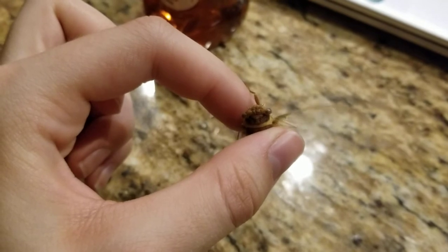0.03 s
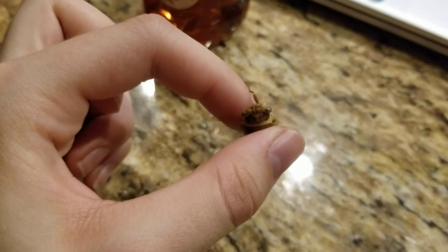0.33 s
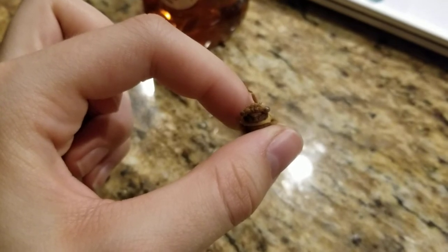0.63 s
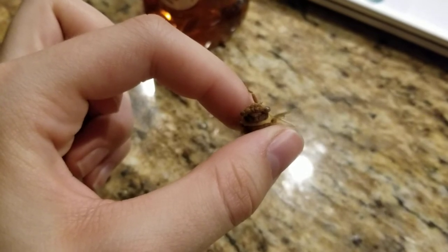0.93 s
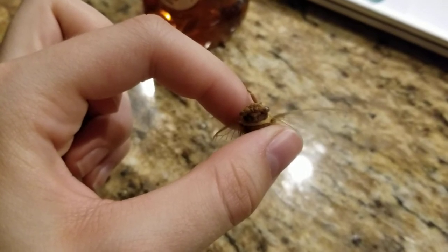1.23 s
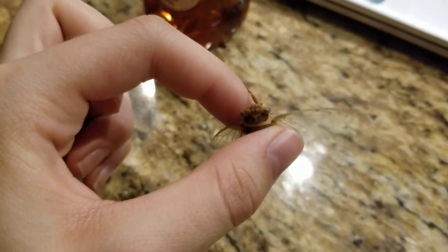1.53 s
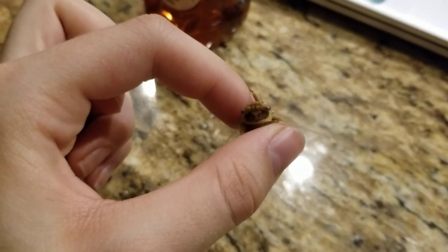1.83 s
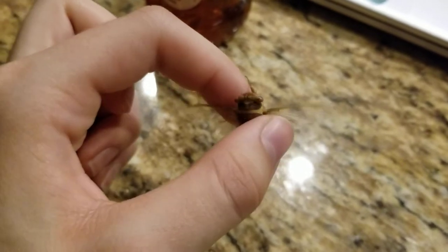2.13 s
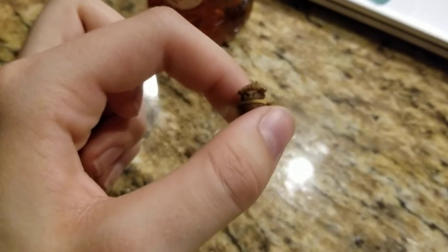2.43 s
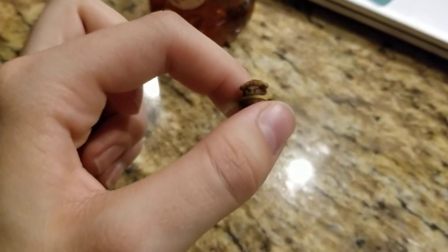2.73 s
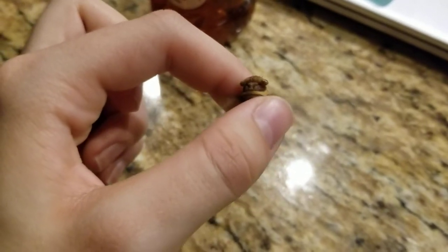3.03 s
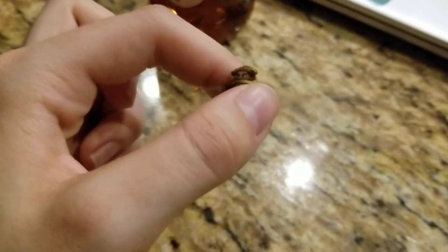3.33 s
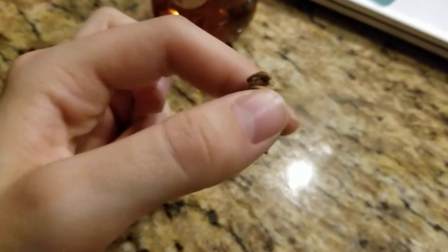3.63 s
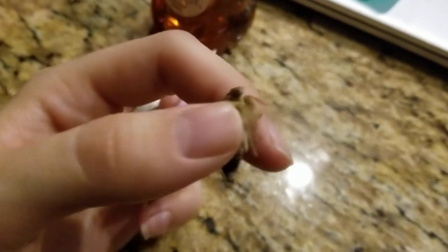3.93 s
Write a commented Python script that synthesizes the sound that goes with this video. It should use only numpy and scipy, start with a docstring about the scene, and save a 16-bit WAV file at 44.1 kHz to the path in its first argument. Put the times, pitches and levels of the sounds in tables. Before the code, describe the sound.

A cicada held between finger and thumb buzzes in harsh, high bursts close to the microphone, mostly on the right. Wing ticks fill the early gaps, then the bursts come shorter and quicker, over a low kitchen rumble.

```python
"""A kitchen, close to the microphone: a cicada held between finger and thumb buzzes in bursts.
Its two tymbals each click in and out about 137 times a second, drift apart and slow at the end
of a burst; the closing fingers colour the buzz. Its wings rustle, tick on the fingers and pat the air.
The insect sits mostly to the right, with a low room rumble and an appliance's hum behind it."""
import sys
import numpy as np
from scipy import signal
from scipy.fft import rfft, irfft
from scipy.io import wavfile
from scipy.ndimage import uniform_filter1d

SR = 44100
rng = np.random.default_rng(int(sys.argv[2]) if len(sys.argv) > 2 else 0)


def to_wav(s):
    """Save 16-bit WAV."""
    ch = np.atleast_2d(s).T  # columns
    pcm = np.round(np.clip(ch, -1, 1) * 32767)  # PCM
    wavfile.write(sys.argv[1], SR, pcm.astype(np.int16))


N = 176400


def amp(db):
    """Decibels to gain."""
    return 10 ** (np.asarray(db) / 20)


def unit_rms(x):
    """Scales to rms 1."""
    return x / np.sqrt(np.mean(x ** 2) + 1e-20)


def unit_energy(x):
    """Scales each channel to energy 1."""
    return x / np.linalg.norm(x, axis=1, keepdims=True)


def at_hz(points, hz):
    """Reads a spectrum on a log-frequency axis."""
    f, value = np.transpose(points)
    return np.interp(np.log(hz + 1), np.log(f), value)


def at_time(points, s):
    """Reads a level curve at time s."""
    return np.interp(s, *np.transpose(points))


def add(mix, s, sound):
    """Mixes a sound into both channels at time s."""
    part = mix[:, max(round(s * SR), 0):][:, :sound.shape[-1]]
    part += sound[..., :part.shape[1]]


def wander(count, size):
    """Smooth chance values of rms 1."""
    return unit_rms(uniform_filter1d(uniform_filter1d(rng.standard_normal(count), size), size))


def drift(count, shape, memory):
    """Chance values of rms 1, one set per stroke, each resembling the one before."""
    values = rng.standard_normal((count, *shape))
    for k in range(1, count):
        values[k] = memory * values[k - 1] + np.sqrt(1 - memory ** 2) * values[k]
    return values


def causal(db):
    """Spectrum of the quickest-dying response with this gain."""
    log_gain = np.log(amp(np.r_[db, db[-2:0:-1]]))
    return np.exp(np.conj(signal.hilbert(log_gain)))[:len(db)]


def tint(x, colour):
    """Filters a long sound to a colour, rms 1."""
    return unit_rms(irfft(rfft(x) * amp(at_hz(colour, np.fft.rfftfreq(N, 1 / SR))), N))


def noise(apart):
    """Stereo noise, partly shared by the two sides."""
    return rng.standard_normal(N) + apart * rng.standard_normal((2, N))


# Steady room tone around the microphone: f/Hz, level/dB
ROOM_TONE = [(20, -17), (53, -23), (84, 1), (200, -1), (528, -12), (929, -19.5), (1700, -42.5), (2500, -37),
             (5000, -22), (16000, -26.5)]
# Swells of low rumble, leaning left: t/s, level/dB
SWELLS = [(0.0, -63.5), (.11, -52), (.57, -56.5), (1.3, -58), (1.71, -53.5), (1.95, -53.5), (2.08, -48),
          (2.13, -64), (2.24, -53), (4.0, -60)]
# Colour of the swells: f/Hz, level/dB
SWELL_COLOUR = [(20, -39), (40, -6), (60, -2), (80, 5), (110, -9), (250, -19), (1000, -64)]
# Partials of an appliance in the background: f/Hz, level/dB
HUM = [(58.8, -65), (193, -64.5), (289, -71.5), (386.6, -76)]
def kitchen_ambience():
    """Room tone with low swells, and an appliance's wavering hum."""
    t = np.arange(N) / SR
    hum = sum(amp(db) * np.sqrt(2) * np.sin(2 * np.pi * hz * t + 0.88 * wander(N, size=9000))
              for hz, db in HUM)
    swells = tint(noise(apart=0.92), SWELL_COLOUR) * amp(at_time(SWELLS, t)) * amp([[3], [-2]])
    return hum + swells + amp(-57) * tint(noise(apart=1.0), ROOM_TONE)


# Fits of wing rustle, close up: t/s, level/dB
RUSTLE_FITS = [(0.0, -66), (.14, -62), (.25, -77), (.32, -54), (.41, -57), (.5, -69.5), (.62, -57),
               (.72, -79.5), (.8, -56), (.88, -54), (.93, -67.5), (1.1, -56.5), (1.26, -78), (1.34, -54),
               (1.41, -56.5), (1.44, -78), (1.53, -76), (1.64, -55.5), (1.71, -61.5), (1.79, -79),
               (1.87, -54.5), (2.05, -56), (2.15, -66), (2.25, -56), (2.6, -57.5), (3.3, -65.5),
               (3.6, -66.5), (3.64, -53), (3.71, -65.5), (3.8, -56), (3.95, -68.5)]
# Colour of the rustle: f/Hz, level/dB
RUSTLE_COLOUR = [(150, -2), (400, -1), (1000, 0.5), (1600, -3.5), (2200, -1.5), (3000, -9.5), (6000, 4),
                 (15000, -24)]
def wing_rustle(wing_hz=43.15, flap_decay_s=.005, uneven_db=1.2, upstroke_db=-3):
    """Wings rustle in fits, one soft flap on each up and down stroke, in step with the wing beats."""
    t = np.arange(N) / SR
    strokes = np.cumsum(2 * wing_hz * (1 + .03 * wander(N, size=3000))) / SR
    for start, end, rate_hz, _ in BEAT_RUNS:
        strokes = np.where((t > start) & (t < end), 2 * rate_hz * (t - start), strokes)
    index = strokes.astype(int)
    strength = amp(uneven_db * rng.standard_normal(N)[index] + upstroke_db * (index % 2))
    flap_age = (strokes % 1) / (2 * wing_hz)
    flaps = strength * np.exp(-flap_age / flap_decay_s) + .16  # some rustle lasts between flaps
    return tint(noise(apart=1.0) * flaps, RUSTLE_COLOUR) * amp(7 + at_time(RUSTLE_FITS, t))


# Colour of a close click in a loose, a firm and a pinched grip: f/Hz, level/dB
LOOSE_GRIP = [(1470, -70), (2500, -52), (3480, -23.5), (4330, -4.5), (4900, -11), (5500, -9.5), (6000, -1),
              (6400, -2.5), (7050, -4), (7800, -14), (8400, -16.5), (9050, -19.5), (9700, -17),
              (10600, -9.5), (12000, -15.5), (13100, -13.5), (14400, -5.5), (15200, -15), (15800, -13.5)]
FIRM_GRIP = [(1470, -42), (2500, -45), (3680, -37), (4320, -22), (4900, -28.5), (5450, -9), (6070, 1.5),
             (7030, -7), (7800, -15), (8520, -14.5), (9350, -19.5), (10500, -14.5), (11150, -18),
             (12300, -10.5), (13300, -15.5), (14500, -26), (15200, -18.5), (15800, -32)]
PINCHED_GRIP = [(1470, -34), (2500, -44), (3200, -37), (3850, -31.5), (4400, -24), (4970, -3.5),
                (5700, 0.5), (6410, -0.5), (7590, -2), (8600, -8.5), (9720, -16), (11200, -12), (12600, -4),
                (14000, -21), (15800, -21)]
# Resonance of the gap between the fingers: t/s, f/Hz, level/dB
FINGER_GAP = [(1.6, 8350, 0.5), (2.1, 9000, -1), (2.5, 8830, 6), (3.0, 8680, 5), (3.25, 8360, 4),
              (3.47, 8270, 7), (3.62, 7920, 4.5), (3.72, 7560, 3.5)]
# The buzz at the microphone, left minus right: f/Hz, level/dB
LEFT_BALANCE = [(2500, 3.5), (4500, -9), (5200, -8.5), (6100, -33), (7000, -47), (8600, -7.5), (10500, -13),
                (12500, -12.5), (15500, -0.5)]
def held_body(start, grip, hz, gap_width_hz=420):
    """Left and right response of the abdomen and the fingers round it."""
    db = sum(np.maximum(1 - abs(np.clip(grip, 0, 2) - k), 0) * at_hz(colour, hz)
             for k, colour in enumerate([LOOSE_GRIP, FIRM_GRIP, PINCHED_GRIP]))
    times, centres, heights = np.transpose(FINGER_GAP)
    gap_hz, gap_db = np.interp(start, times, centres), np.interp(start, times, heights)
    peak = np.exp(-((hz - gap_hz) / gap_width_hz) ** 2)
    dip = np.exp(-((hz - gap_hz * .885) / gap_width_hz) ** 2)
    low_cut_db = at_hz([(1200, -15.5), (3000, -4.0), (4200, -2.5)], hz)
    db = db + gap_db * (peak - dip) + low_cut_db
    left, right = causal(db + at_hz(LEFT_BALANCE, hz)), causal(db)
    return np.array([left, right]) / np.linalg.norm(irfft(right))


RETURN_MS = 3.6  # from a tymbal's in-click to its out-click, unsqueezed
def stroke_times(start, end, rate_hz, sag=.22, sag_s=.018):
    """Steady muscle strokes that slow just before the last one."""
    last = end - RETURN_MS / 1000
    if last - start < .5 / rate_hz:
        return [start]
    t = np.linspace(start, last, 400)
    lost_s = sag * sag_s * (np.exp((t - last) / sag_s) - np.exp((start - last) / sag_s))
    turns = (t - start - lost_s) * rate_hz
    return np.interp(np.linspace(0, turns[-1], round(turns[-1]) + 1), turns, t)


# Loose crinkling in a click: f/Hz, share of the power/0-1
CRINKLE_SHARE = [(3000, 0.42), (5000, 0.36), (6100, 0.12), (7200, 0.57), (9000, 0.39), (12500, 1),
                 (15800, 1)]
def buckle(rib_phase, creases, hz, crinkle_s=.0015):
    """Spectrum of one buckling: a clean snap, and a crinkle that trails it in the treble."""
    t = np.arange(creases.shape[1]) / SR
    crinkle = rfft(unit_energy(creases * np.exp(-t / crinkle_s)))
    share = at_hz(CRINKLE_SHARE, hz)
    return np.sqrt(1 - share) * np.exp(1j * rib_phase) + np.sqrt(share) * crinkle


# Change of colour as a burst goes on: f/Hz, slope/(dB/s)
BRIGHTENING = [(7500, -8), (10500, 8), (15000, -11)]
# Rise and fall of the buzz's treble: t/s, level/dB
TREBLE_LEVEL = [(.82, -6), (.93, 4.5), (1.06, -3), (1.3, -2.5), (2.15, 0), (2.6, 9), (3.3, 2.5), (3.65, -6),
                (3.8, 8.5)]
# How much of that level each band takes: f/Hz, share/0-1
TREBLE_SHARE = [(7000, 0), (10000, 0.12), (14500, 0.18)]
# Buzzes close to the microphone: start t/s, end t/s, stroke f/Hz, level/dB, second tymbal's lag/ms,
# its settling time/s, its out-click level/dB, grip (0 loose, 1 firm, 2 and up pinched)
BURSTS = [(0.01, 0.017, 137, -2.5, 0, .05, -19, -0.5), (0.288, .474, 136, -1.5, 1.2, 0.07, 2.5, 0.5),
          (0.7667, 1.07, 137, -1.5, 2.63, 0.061, 4.5, 0.53), (1.084, 1.09, 170, -1.5, -3, .05, 6, 1.2),
          (1.292, 1.379, 156, -0.5, 1, 0.025, -2, 0.52), (1.5564, 1.638, 172, -2, 2, 0.024, 1, 0.6),
          (1.65, 1.658, 131, -2, 0, .05, 3, 0.5), (1.8301, 2.168, 135, 0.5, 1.8, 0.089, 3.5, 0.8),
          (2.177, 2.265, 131, 1.5, 3, 0.0044, -0.5, 0.86), (2.2859, 2.374, 129, 4, 1.2, 0.0042, -28, 1),
          (2.4214, 2.57, 138, 3, 1.5, 0.015, -7.5, 0.98), (2.607, 2.699, 144, 4, 3, 0.0054, -29, 1.02),
          (2.7338, 2.862, 126, 2.5, 3, .006, 0, 1), (2.88, 3.045, 134, 2.5, 2.5, 0.0056, -3, 1),
          (3.0633, 3.159, 137, 3, 2, 0.0025, -36, 1.06), (3.213, 3.215, 160, 1, -6, .05, -5, 1.3),
          (3.235, 3.307, 135, 1.5, 2.5, 0.018, -1, 1.2), (3.4403, 3.501, 145, 2, 2.9, 0.0087, -2.5, 1.5),
          (3.6155, 3.679, 131, 4, 2.1, 0.0075, -7, 1.7), (3.7272, 3.906, 132, 2.63, 2.2, 0.0056, -8, 2.24)]
def tymbals(size=512, swell_db_per_s=14.5, slip_ms=.17, jitter_ms=.027, uneven_db=.8):
    """Each muscle stroke clicks a tymbal in and out; the second tymbal lags. Long bursts brighten."""
    out, hz = np.zeros((2, N)), np.fft.rfftfreq(size, 1 / SR)
    muscle_thump = amp(-56.5) * np.hanning(round(.0053 * SR))
    lead = size // 8  # samples of room for the front of a click
    # Ribs buckle one after another, which smears the phase of each click.
    rib_phases = [1.34 * wander(len(hz), size=24) for _ in range(4)]
    brightening, treble = at_hz(BRIGHTENING, hz), at_hz(TREBLE_SHARE, hz)
    for start, end, rate_hz, db, lag_ms, lag_s, return_db, grip in BURSTS:
        body = held_body(start, grip, hz)
        crease_sets = drift(count=64, shape=(4, 2, size), memory=.75)
        slips = slip_ms * drift(count=64, shape=(), memory=.96)
        chances = rng.standard_normal((64, 4, 2))
        back_ms = RETURN_MS - .22 * min(grip, 1)  # springs back sooner when squeezed
        times = stroke_times(start, end, rate_hz)
        for s, crease_set, slip, chance in zip(times, crease_sets, slips, chances):
            age = s - start
            behind_ms = (lag_ms + slip) * (1 - np.exp(-age / lag_s))
            onset_db = .5 * (1 - np.exp(-age / .011))
            stroke_db = db + onset_db + swell_db_per_s * (s - (start + end) / 2)
            tone = body * amp((age - .13) * brightening + at_time(TREBLE_LEVEL, s) * treble)
            # The second tymbal fades on the last stroke.
            fade_db = -20 * np.exp((s - end + RETURN_MS / 1000) / .005) * (age > 0)
            clicks = [(0, 0), (back_ms, 0),  # first tymbal in, out; then the second
                      (behind_ms, fade_db), (behind_ms + back_ms, return_db + fade_db)]
            for (ms, click_db), ribs, creases, (force, late) in zip(
                    clicks, rib_phases, crease_set, chance):
                click = np.roll(irfft(tone * buckle(ribs, creases, hz)), lead, axis=1)
                gain = amp(stroke_db + click_db + uneven_db * force)
                add(out, s + (ms + jitter_ms * late) / 1000 - lead / SR, click * gain)
            add(out, s, muscle_thump * amp(db))
    return out


# Wing strikes on the fingers, close and to the right: t/s, level/dB
WING_STRIKES = [(0.057, -26.5), (.091, -20), (0.098, -28), (.113, -20), (0.125, -25), (0.139, -17.5),
                (.148, -27), (.162, -18), (0.18, -25), (0.277, -27.5), (.548, -21), (0.57, -25),
                (.582, -23), (.597, -17.5), (.607, -26), (.62, -16), (.633, -25), (0.648, -18.5),
                (0.659, -23.5), (1.081, -21), (1.096, -18.5), (1.116, -14.5), (1.129, -21), (1.144, -17),
                (1.154, -23), (1.4, -15.5), (1.414, -22.5), (1.669, -25), (1.682, -17.5), (1.696, -23),
                (1.713, -17), (1.722, -25.5), (1.821, -25.5), (3.426, -30), (3.543, -27), (3.565, -27),
                (3.589, -25.5), (3.705, -30), (3.981, -28)]
# Colour of a strike: f/Hz, level/dB
STRIKE_COLOUR = [(200, -45), (1000, -13), (2100, -15), (2900, -22), (4000, -3), (6000, -2), (8000, -12),
                 (12000, -4), (15800, -1.5)]
def wing_ticks(size=512, decay_s=.0015, left_db=-5.5):
    """A wing edge snaps against a finger."""
    out, t = np.zeros((2, N)), np.arange(size) / SR
    colour = causal(at_hz(STRIKE_COLOUR, np.fft.rfftfreq(size, 1 / SR)))
    for s, db in WING_STRIKES:
        impact = rng.standard_normal((2, size)) * np.exp(-t / decay_s)
        snap = unit_energy(irfft(rfft(impact) * colour))
        add(out, s - decay_s / 2, snap * amp(15 + db))
    return out * amp([[left_db], [0]])


# Runs of even wing beats, close and near centre: start t/s, end t/s, beat f/Hz, peak level/dB
BEAT_RUNS = [(1.862, 2.087, 40, -48), (2.201, 2.527, 46, -49.5), (2.543, 2.853, 42.6, -55),
             (3.312, 3.436, 43.4, -44), (3.446, 3.619, 39, -49)]
# Colour of one beat: f/Hz, level/dB
BEAT_COLOUR = [(25, -42), (90, 0), (135, 6.5), (190, -14), (320, -4), (550, -4), (780, 1), (950, 1),
               (1150, -7), (1450, -21), (3000, -31)]
def wing_beats(size=4096, left_db=-0.5):
    """Freed wings pat the air evenly, each beat the same soft pop."""
    out = np.zeros((2, N))
    pat = irfft(causal(at_hz(BEAT_COLOUR, np.fft.rfftfreq(size, 1 / SR))))
    for start, end, rate_hz, db in BEAT_RUNS:
        for s in np.arange(start, end, 1 / rate_hz):
            add(out, s, pat / abs(pat).max() * amp(db))
    return out * amp([[left_db], [0]])


# The kitchen's tail at the microphone; the treble spreads wider into the room: f/Hz, level/dB
TAIL_COLOUR = [(3000, 8), (6100, -8.5), (9000, -2), (13000, 6)]
# Time for the tail to fall 60 dB: f/Hz, t/s
TAIL_T60 = [(300, 0.23), (3000, 0.33), (6000, 0.49), (10000, 0.33), (16000, 0.26)]
def kitchen_echoes(insect, near_decay_s=.0022):
    """Quick echoes off hand and counter, then the kitchen's tail, both fed by the right channel."""
    t = np.arange(SR) / SR
    hz, frame_s, spectra = signal.stft(rng.standard_normal((2, SR)), SR, nperseg=256)
    tail_db = at_hz(TAIL_COLOUR, hz)[:, None] - 60 * frame_s / at_hz(TAIL_T60, hz)[:, None]
    tail = signal.istft(spectra * amp(tail_db), SR, nperseg=256)[1][:, :SR] * (t > .004)
    near = rng.standard_normal((2, SR)) * np.exp(-t / near_decay_s) * (t > .0007)
    response = amp([[-27], [-11.5]]) * unit_energy(tail) + amp([[-17.5], [-16]]) * unit_energy(near)
    return signal.fftconvolve(insect[1:], response, axes=1)[:, :N]


def scene():
    """The cicada, close and mostly on the right, with the kitchen around it."""
    insect = tymbals() + wing_ticks() + wing_rustle() + wing_beats()
    return insect + kitchen_echoes(insect) + kitchen_ambience()


def record(dry):
    """The recorder behind the stereo microphone cuts off at 15.8 kHz."""
    low_pass = signal.firwin(401, 15800, window=("kaiser", 8), fs=SR)
    return signal.oaconvolve(dry, low_pass[None], "same")


dry = scene()
out = record(dry)
to_wav(out)
```